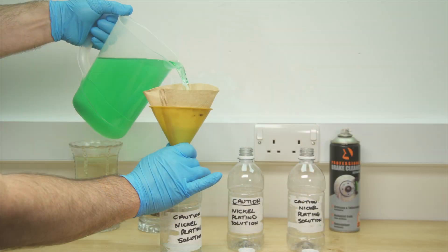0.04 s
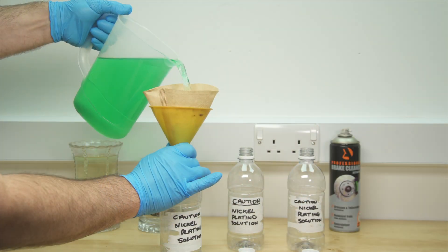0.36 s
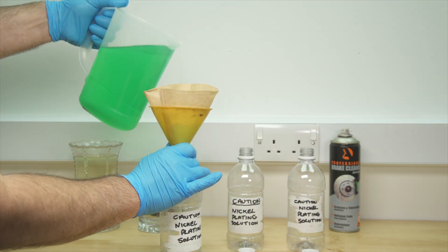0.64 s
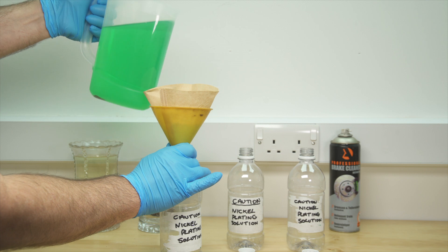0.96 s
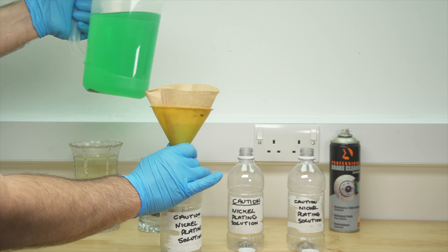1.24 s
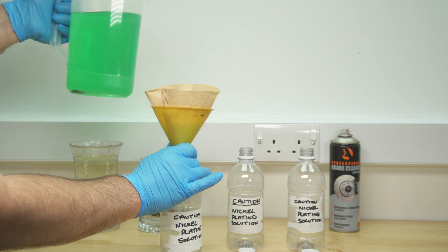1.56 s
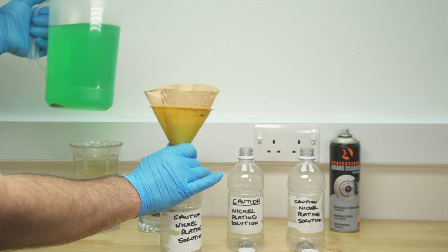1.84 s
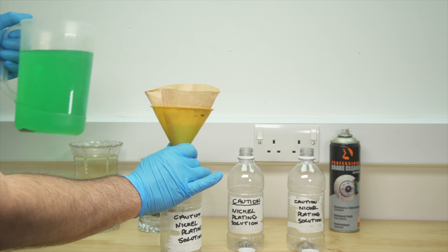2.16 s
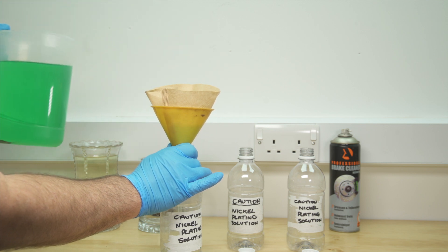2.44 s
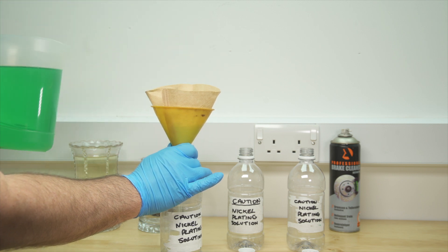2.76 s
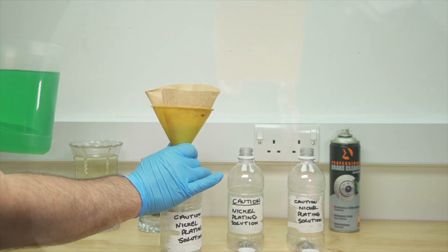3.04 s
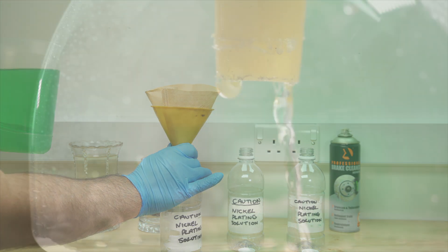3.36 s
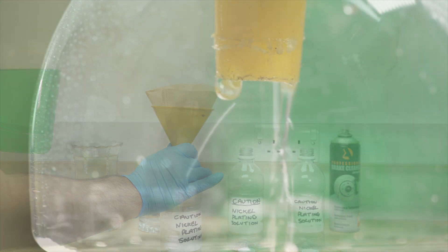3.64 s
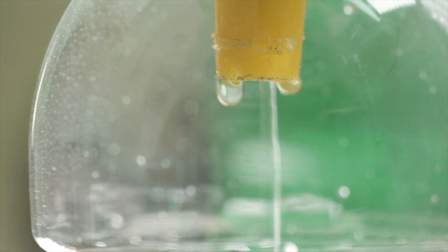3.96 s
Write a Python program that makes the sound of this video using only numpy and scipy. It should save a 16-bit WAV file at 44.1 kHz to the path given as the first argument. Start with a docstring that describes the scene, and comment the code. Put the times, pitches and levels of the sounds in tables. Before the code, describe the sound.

In a small room, liquid drips and burbles softly through a funnel into a faintly ringing plastic bottle. The quick, uneven drops grow sparser, then return with a light spray near the end, over steady hiss.

```python
"""On a workbench close to a wall, liquid trickles out of a filter funnel into a plastic bottle.
Each drop traps a bubble that plops briefly, and large bubbles gurgle upward in pitch. Tiny bubbles
tick, droplets spatter, and near the end a thin stream adds a fine spray. The bottle rings faintly
with them all. The wall throws every plop back, the small room adds a short fading tail,
and a steady hiss lies underneath."""
import sys
import numpy as np
from scipy import signal
from scipy.fft import rfft, irfft
from scipy.io import wavfile

SR = 44100
rng = np.random.default_rng(int(sys.argv[2]) if len(sys.argv) > 2 else 0)


def wav_record(signal):
    """Record a signal, one row per channel, as 16-bit PCM in the file named by sys.argv[1]."""
    frames = np.transpose(np.atleast_2d(signal))
    bounded = np.clip(frames, -1, 1)
    # unit amplitude maps onto the largest positive 16-bit level
    quanta = np.round(bounded * 32767).astype(np.int16)
    wavfile.write(sys.argv[1], SR, quanta)


N = 176400  # 4 seconds

# tone of the room's hiss, as strength per hertz: f/Hz, left level/dB, right level/dB
ROOM_HISS = [(24.6, -80, -91.5), (60, -84, -83), (112, -85.5, -84), (185, -80.5, -76), (232, -82.5, -85.5),
             (416, -84, -92), (696, -85.5, -90), (970, -86.5, -88), (1580, -90, -100.5), (2870, -94, -99),
             (3880, -96, -97.5), (6170, -101.2, -100.2), (9500, -103.6, -101.2), (16700, -105, -102)]
# how loud the fine trickle is as time goes on: t/s, level/dB
TRICKLE_LEVELS = [(0, 1.5), (.3, -3), (.55, -10), (.8, -2.5), (1.05, -2.5), (1.4, -5.5), (1.7, -9),
                  (2.3, -11.5), (2.8, -7), (3.3, -10.5), (3.6, 0), (4, -17.5)]
# tiny bubbles bursting: t/s, ping level/dB, f/Hz, crack level/dB
BUBBLE_BURSTS = [(0.0253,-43,7970,-46.5), (.033,-45,3700,-42.5), (0.261,-55,6200,-45.5),
                 (0.4591,-43,6960,-45), (0.688,-47,7300,-48.5), (0.728,-43.5,4730,-43),
                 (1.0766,-48.5,3950,-48), (1.1113,-52,3900,-50), (1.249,-47.5,6040,-48),
                 (1.33,-50,8460,-50), (1.338,-53,3820,-49), (1.475,-46,9360,-48), (1.5454,-46,3960,-52),
                 (1.6507,-44,4480,-47), (2.127,-54,6100,-48.5), (2.2806,-52.5,3820,-54),
                 (2.399,-52,3830,-55), (2.462,-52,8380,-53), (2.6236,-50,4730,-51), (2.6797,-49,4870,-50),
                 (2.762,-55,6100,-62), (2.823,-52,9460,-59), (2.862,-50,5850,-45), (3.485,-46,2900,-43.5),
                 (3.502,-53,8220,-53), (3.5208,-38,3300,-50), (3.554,-48,2880,-55), (3.5902,-50,9590,-61),
                 (3.6373,-41,5940,-49), (3.7496,-57,9480,-51), (3.86,-54.5,6040,-48), (3.919,-48,4680,-54)]
# drops landing in the bottle: t/s, plop level/dB, f/Hz, splash level/dB
DROP_LANDINGS = [(0.035, -34.5, 1410, -40), (0.0412, -30.5, 1345, -33), (0.06, -34.5, 1400, -35),
                 (0.105, -39, 970, -67), (0.1295, -41, 950, -55), (0.1528, -36, 980, -50),
                 (0.1648, -39, 1010, -42), (0.179, -36.5, 1700, -48), (0.2225, -29.5, 1081, -41),
                 (0.2255, -32.5, 2070, -51), (0.262, -31.5, 1410, -38), (0.2814, -38.5, 1440, -43),
                 (0.3547, -31.5, 1310, -39.5), (0.462, -37.5, 1270, -63), (0.528, -38.5, 1240, -69),
                 (0.6061, -42, 1200, -65), (0.6429, -27.5, 1280, -37), (0.6908, -30.5, 1150, -41),
                 (0.6989, -28, 1130, -52), (0.7304, -37, 1230, -49), (0.739, -30, 1157, -58),
                 (0.7785, -35, 1130, -62), (0.8298, -39.5, 1050, -59), (0.9015, -43, 2070, -52),
                 (0.959, -38.5, 1450, -40), (0.9848, -31, 1300, -40), (1.0257, -36, 1160, -46),
                 (1.0316, -31, 1115, -41.5), (1.047, -37, 2350, -46), (1.0497, -34.5, 1100, -47),
                 (1.067, -32, 1160, -50), (1.1095, -34.5, 1200, -47), (1.1313, -33.5, 1190, -58),
                 (1.1869, -26.5, 1180, -40), (1.2198, -42, 1205, -49), (1.252, -37, 1540, -43),
                 (1.3366, -35, 1500, -43.5), (1.386, -38, 1350, -51), (1.4085, -33, 1323, -60),
                 (1.4768, -27, 1196, -44), (1.512, -40.0, 1110, -61), (1.5441, -33.5, 1190, -61),
                 (1.6528, -39.5, 1350, -51), (1.742, -33.5, 1200, -58), (1.772, -36.5, 1300, -54),
                 (1.8453, -42, 1165, -70), (2.05, -45, 1400, -52), (2.1279, -37.5, 1070, -52),
                 (2.1575, -39.5, 1105, -60), (2.3479, -41.5, 1320, -46), (2.463, -43, 1600, -56),
                 (2.5381, -35.5, 1145, -50), (2.677, -32.5, 1470, -48), (2.7753, -36.5, 1667, -42.5),
                 (2.8609, -33, 1645, -43.5), (2.9169, -40, 1260, -61.0), (2.959, -39.5, 1380, -48),
                 (2.996, -44, 1512, -48), (3.08, -36, 1820, -48), (3.099, -43, 1540.0, -41),
                 (3.1203, -39, 1650, -37), (3.1381, -36, 1760, -58), (3.206, -44, 1113, -63),
                 (3.3769, -30, 1195, -47), (3.5418, -33, 1410, -60), (3.563, -39.5, 1360, -67),
                 (3.603, -51, 1920, -33), (3.645, -37, 1580, -58), (3.675, -33.5, 1260, -43),
                 (3.7666, -29.5, 1560, -44), (3.8472, -30, 1320, -38), (3.93, -34, 1590, -60)]
# large bubbles gurgling: t/s, length/s, level/dB, starting f/Hz
LARGE_BUBBLES = [(.143, 0.048, -38.5, 957), (.826, .05, -50, 1105), (0.893, 0.042, -50.5, 1440),
                 (2.106, 0.061, -48, 983)]
# droplets hitting the plastic: t/s, level/dB
DROPLET_HITS = [(0.184, -48.5), (.367, -51), (0.461, -44), (.489, -50), (.5185, -40.5), (0.6031, -45),
                (0.622, -45), (.728, -45), (1.247, -42), (1.475, -50), (1.504, -52), (1.859, -52),
                (2.654, -52), (2.724, -50), (3.0485, -45), (3.206, -52), (3.617, -51), (3.808, -49),
                (3.859, -48)]
# notes at which the bottle rings: f/Hz, level/dB, width/Hz
BOTTLE_NOTES = [(1122, 2.5, 67), (1161, -3, 37), (1455, 4.5, 34), (1651, 1, 28), (1781, 3, 33),
                (1807, -2, 22), (2090, 4, 25), (3000, -2, 16), (3669, 12, 15), (3840, 11.5, 19),
                (4850, 4.5, 12), (6010, 13.5, 11.3), (6250, 7, 13), (6640, -17, 45)]
# echoes from the bench and walls: delay t/s, level/dB
NEAR_ECHOES = [(.00373, -12), (.00986, -4.5), (0.0126, -12.5), (0.0112, -11.5), (.0193, -13.5),
               (0.034, -12)]


def from_db(db):
    """Turn decibels into a number to multiply by: 0 dB gives 1, -6 dB about a half."""
    return 10 ** (np.asarray(db) / 20)


def add(out, start_s, sound):
    """Mix a short sound into the track at the given time."""
    i = int(np.clip(start_s * SR, 0, N - 1))
    out[i:i + len(sound)] += sound[:N - i]


def filtered(x, kind, hz, order=2):
    """Keep the "low" part, the "high" part or a "band" of a sound; a higher order cuts more sharply."""
    return signal.sosfilt(signal.butter(order, hz, kind, fs=SR, output="sos"), x)


def band_around(hz, octaves):
    """The lower and upper edge of a band centred on a pitch."""
    return hz * 2 ** (np.array([-0.5, 0.5]) * octaves)


def hiss():
    """The room hisses steadily, with its own noise on each side."""
    hz, *sides = np.transpose(ROOM_HISS)
    log_hz = np.log(np.maximum(np.fft.rfftfreq(N, 1 / SR), 1))
    gain = from_db([np.interp(log_hz, np.log(hz), db) for db in sides]) * np.sqrt(SR / 2)
    return irfft(rfft(rng.standard_normal((2, N))) * gain, N)


def bubble(hz, rise_s, glide_per_s=0):
    """A bubble rings with a tone that swells and quickly dies; a glide makes its pitch creep up."""
    t = np.arange(SR // 50) / SR
    swell = t / rise_s * np.exp(1 - t / rise_s)
    return swell * np.sin(2 * np.pi * hz * t * (1 + glide_per_s * t / 2))


def trickle(per_s, level_db, low_hz, high_hz, rise_cycles, spread_db=4.5):
    """Faint bubbles ring at random moments and pitches, louder when more liquid flows."""
    out = np.zeros(N)
    for when, pitch, strength in rng.random((int(per_s * N / SR), 3)):
        start_s = when * N / SR
        hz = low_hz * (high_hz / low_hz) ** pitch
        flow_db = np.interp(start_s, *np.transpose(TRICKLE_LEVELS))
        db = level_db + flow_db + spread_db * (2 * strength - 1)
        add(out, start_s, from_db(db) * bubble(hz, rise_s=rise_cycles / hz))
    return out


def ticks(crack_decay_s=0.006):
    """A tiny bubble bursts with a high ping and a crack of spray around the same pitch."""
    out, t = np.zeros(N), np.arange(SR // 50) / SR
    for start_s, ping_db, hz, crack_db in BUBBLE_BURSTS:
        ping = bubble(hz, rise_s=0.001, glide_per_s=1.8)
        puff = rng.standard_normal(len(t)) * np.exp(-t / crack_decay_s)
        crack = filtered(puff, "band", band_around(hz, octaves=0.62), order=1)
        add(out, start_s, from_db(ping_db + 1) * ping + from_db(crack_db + 6) * crack)
    return out


def drops(plop_lead_s=0.00041, splash_rise_s=0.0029):
    """Each drop traps a bubble that plops; a splash of many smaller bubbles comes just after."""
    out, t = np.zeros(N), np.arange(SR // 20) / SR
    swell = t / splash_rise_s * np.exp(1 - t / splash_rise_s)
    for start_s, plop_db, hz, splash_db in DROP_LANDINGS:
        plop = bubble(hz, rise_s=0.0013, glide_per_s=7.2)
        froth = filtered(rng.standard_normal(len(t)), "band", band_around(hz=1946, octaves=0.4))
        add(out, start_s - plop_lead_s, from_db(plop_db - 2.5) * plop)
        add(out, start_s, from_db(splash_db - 6) * swell * froth / froth.std())
    return filtered(out, "high", hz=704)


def gurgles(climb_hz_per_s=3250, wobble_depth=0.8, wobble_step_s=0.0041):
    """A large bubble swells and fades unevenly, its pitch climbing as it nears the surface."""
    out = np.zeros(N)
    for start_s, length_s, db, hz in LARGE_BUBBLES:
        t = np.arange(int(length_s * SR)) / SR
        wobble = np.interp(t / wobble_step_s, np.arange(32), rng.standard_normal(32))
        swell = np.sin(np.pi * t / length_s) * (1 + wobble_depth * wobble)
        tone = np.sin(2 * np.pi * t * (hz + climb_hz_per_s * t / 2))
        add(out, start_s, from_db(db) * swell * tone)
    return out


def spatter(decay_s=0.0037):
    """A flung droplet hits the plastic with a dry, bright tick that has no pitch."""
    out, t = np.zeros(N), np.arange(SR // 20) / SR
    for start_s, db in DROPLET_HITS:
        hit = rng.standard_normal(len(t)) * np.exp(-t / decay_s)
        add(out, start_s, from_db(db + 4.5) * hit)
    return filtered(out, "high", hz=10600)


def spray(start_s=3.02, swell_s=0.64):
    """A fine, bright spray grows as a thin stream sets in near the end."""
    swell = np.clip((np.arange(N) / SR - start_s) / swell_s, 0, 1)
    return from_db(-60.5) * swell * filtered(rng.standard_normal(N), "high", hz=2784)


def resonance(x, hz, width_hz):
    """Pick out one note of a sound; the narrower the width, the longer it rings."""
    r = np.exp(-np.pi * width_hz / SR)  # share of the ringing left after one sample
    feed_in = np.array([1, 0, -1]) * (1 - r * r) / 2
    feedback = [1, -2 * r * np.cos(2 * np.pi * hz / SR), r * r]
    return signal.lfilter(feed_in, feedback, x + 1e-18)  # the tiny offset keeps the maths fast


def bottle(x):
    """The bottle rings along with the sounds inside it."""
    return x + sum(from_db(db) * resonance(x, hz, width) for hz, db, width in BOTTLE_NOTES)


def echoes(x):
    """The bench and walls throw the sound back, a little later and duller."""
    dull = filtered(x, "low", hz=3700, order=1)
    n = np.arange(N)
    return sum(from_db(db) * np.interp(n - delay_s * SR, n, dull, left=0) for delay_s, db in NEAR_ECHOES)


def room(x, fade_60_db_s=0.17, onset_s=0.0055):
    """The bottle stands to the right, where the near echoes are too; both sides get a short tail."""
    t = np.arange(SR // 2) / SR
    build_up = 1 - np.exp(-(t / onset_s) ** 2)
    tails = rng.standard_normal((2, len(t))) * from_db(-60 * t / fade_60_db_s) * build_up
    left_tail, right_tail = (signal.fftconvolve(x, tail / np.linalg.norm(tail))[:N] for tail in tails)
    left = from_db(-12) * x + from_db(-10) * left_tail
    right = x + echoes(x) + from_db(-3.5) * right_tail
    return np.array([left, right])


def scene():
    """All the liquid sounds ring in the bottle and spread through the room, over the hiss."""
    burble = trickle(per_s=140, level_db=-47.5, low_hz=1023, high_hz=2120, rise_cycles=1.79)
    fizz = trickle(per_s=220, level_db=-57, low_hz=2708, high_hz=9530, rise_cycles=6.6)
    liquid = burble + fizz + ticks() + drops() + gurgles() + spatter() + spray()
    return room(bottle(liquid)) + hiss()


def record(dry):
    """The very highest treble is cut off sharply."""
    cutoff_hz = 15750
    return signal.sosfilt(signal.ellip(12, 0.1, 70, cutoff_hz, fs=SR, output="sos"), dry)


dry = scene()
out = record(dry)
wav_record(out)
```